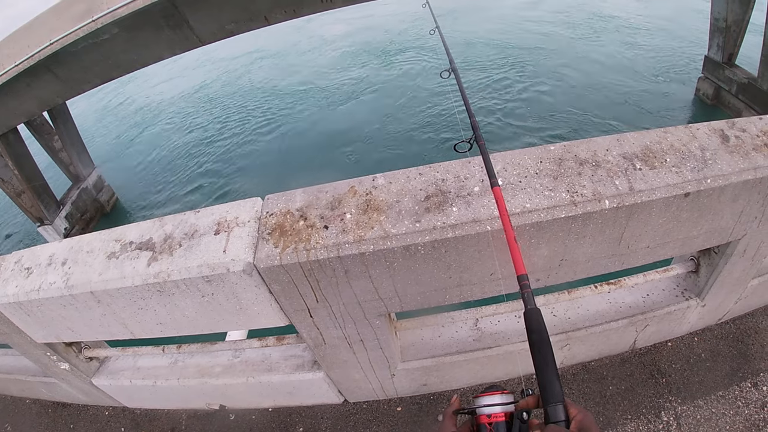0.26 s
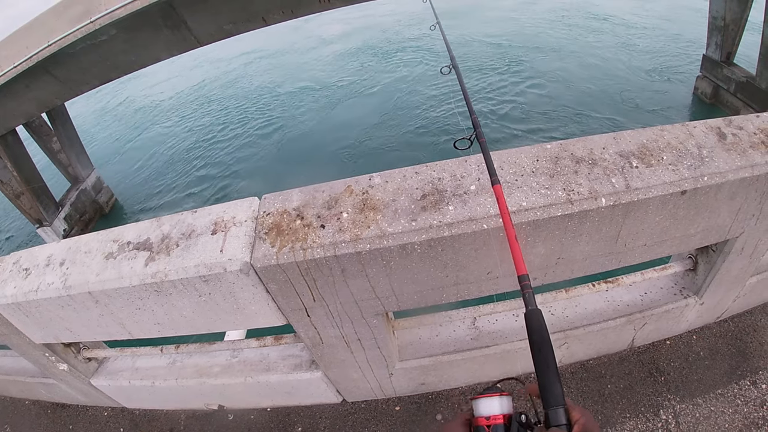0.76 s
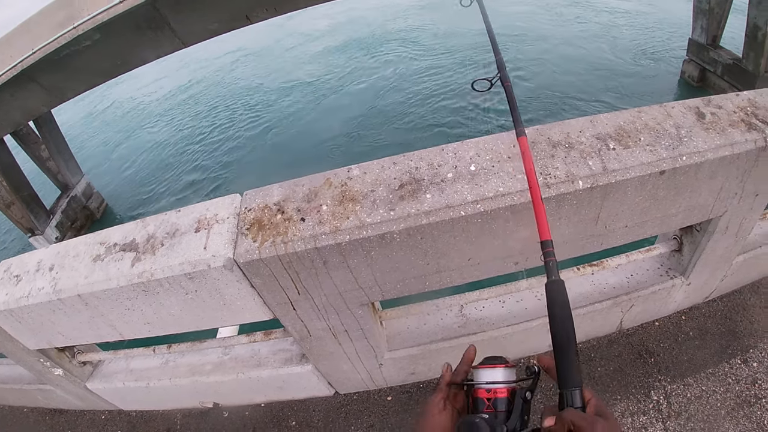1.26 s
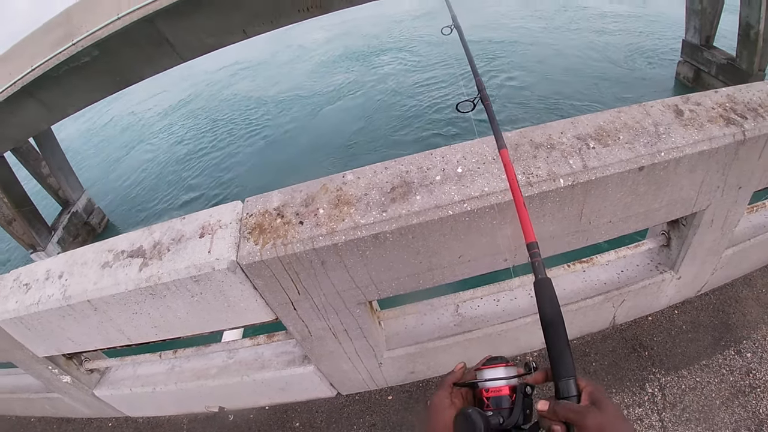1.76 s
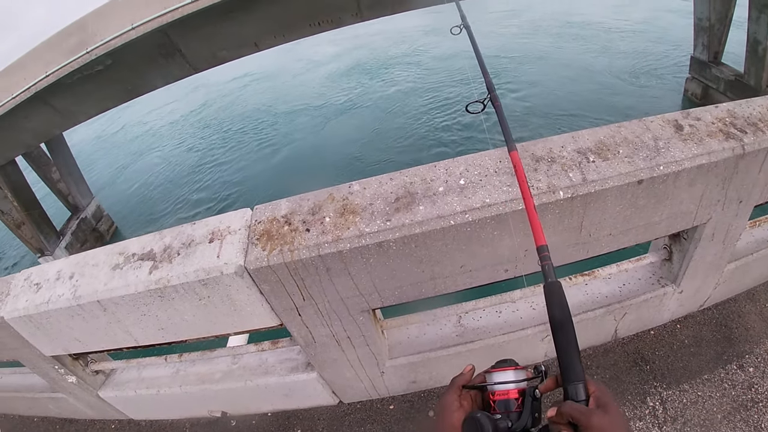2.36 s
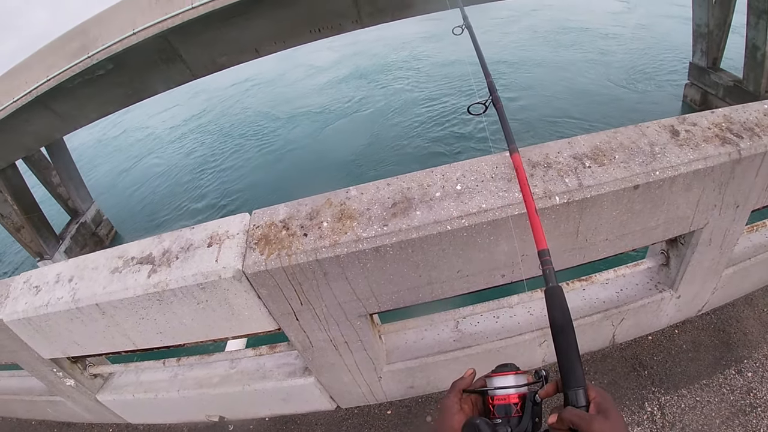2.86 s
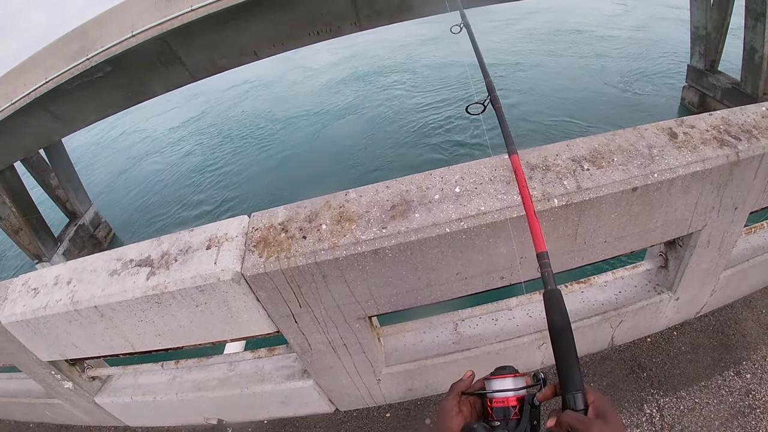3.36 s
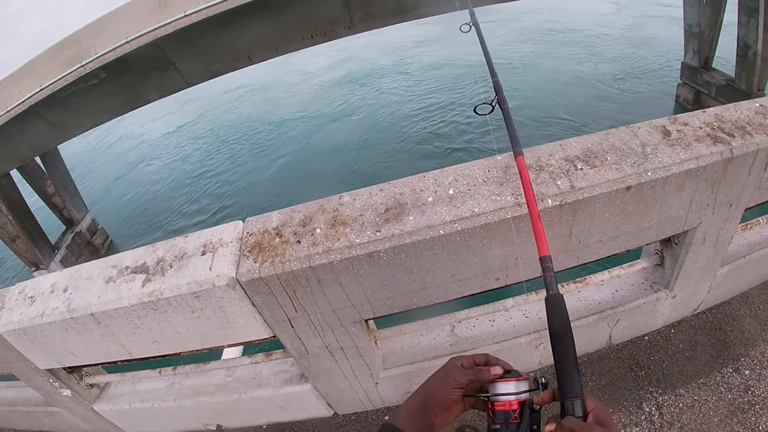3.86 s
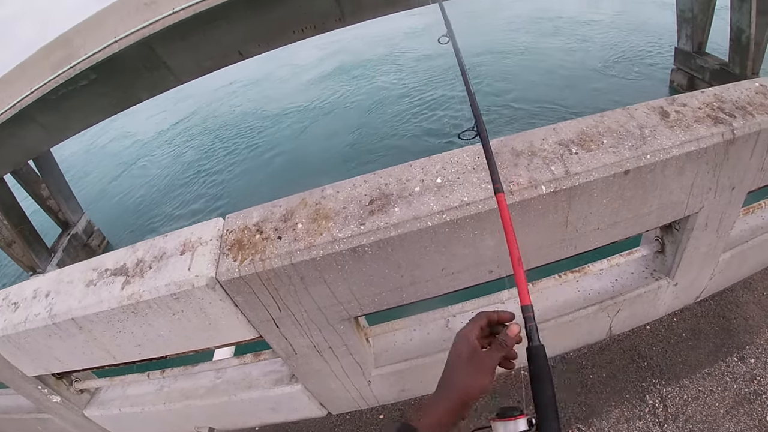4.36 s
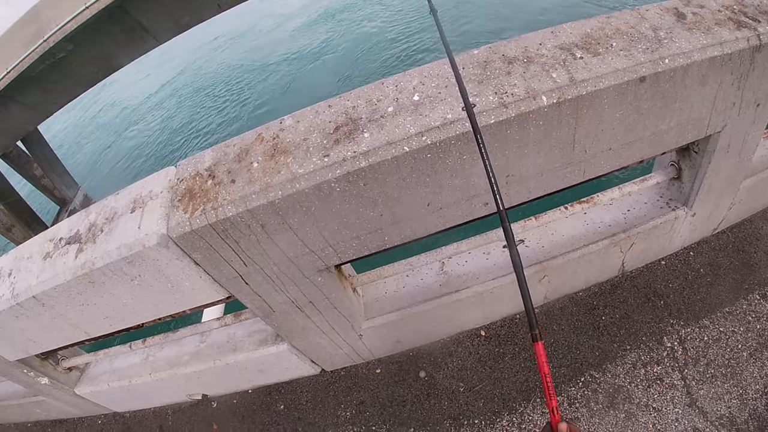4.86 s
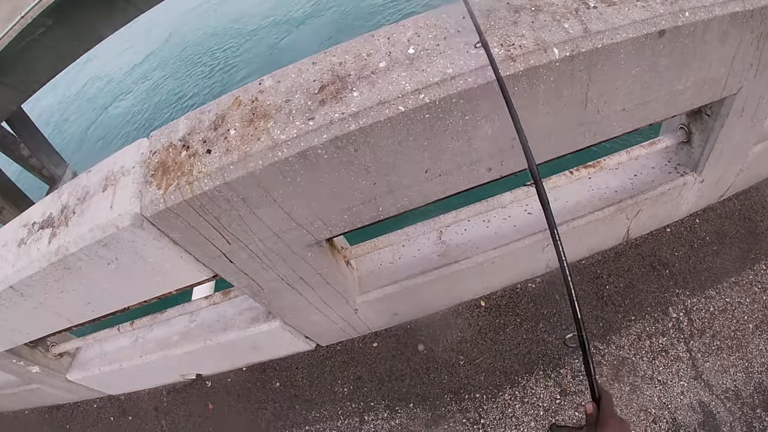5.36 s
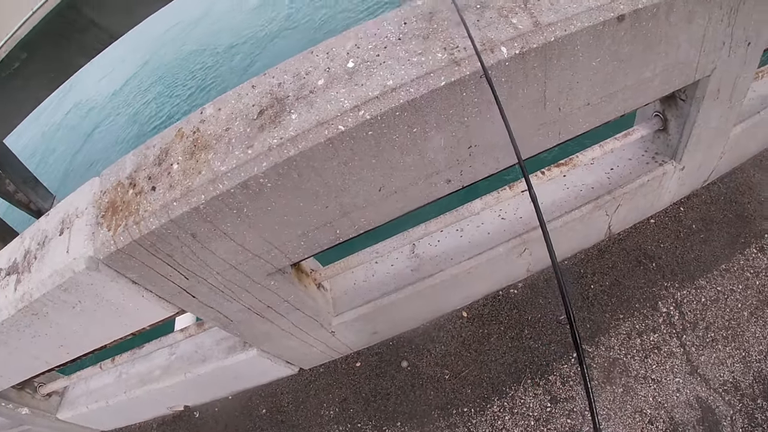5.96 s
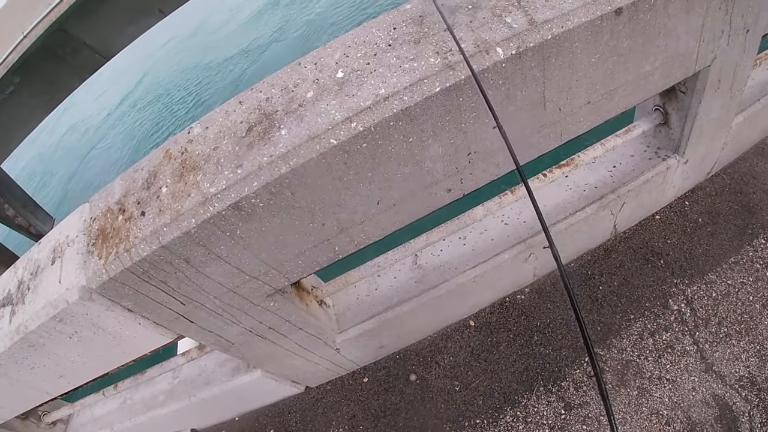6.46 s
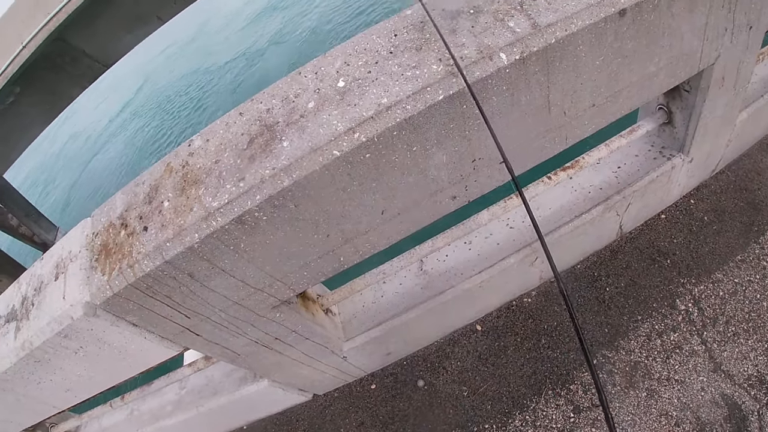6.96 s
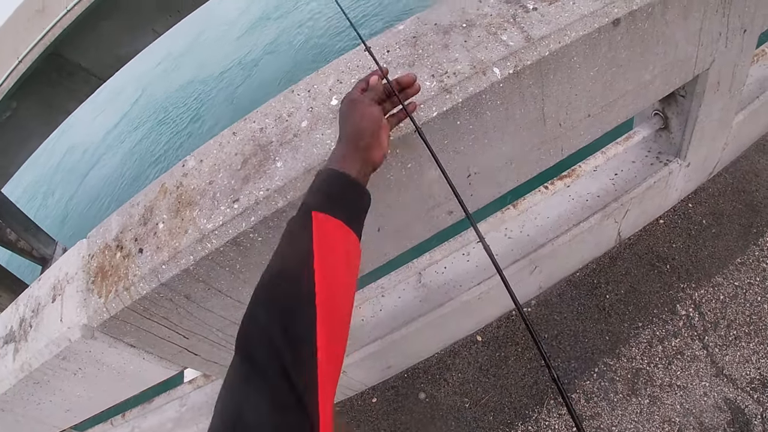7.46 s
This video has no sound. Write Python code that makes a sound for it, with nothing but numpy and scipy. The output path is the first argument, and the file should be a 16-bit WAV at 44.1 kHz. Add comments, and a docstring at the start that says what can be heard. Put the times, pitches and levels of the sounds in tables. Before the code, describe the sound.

From the start, broad traffic roar, tyre hiss and low engine drones surround a concrete pier, with a nearer vehicle leaving within the first second. Another car's tyre noise fades and sinks in pitch until about 4 s. Wind flutters and hums hollowly at the close microphone throughout. Light ticks at 0.6 and 0.8 s lead to a loud, bright bail snap at 0.86 s and a harder metallic clack with chatter at 1.2 s, with a brief hand rustle. Small ticks follow at 2.5 and around 3.1 s. Hands rub and nails faintly pick around 3.8-4.1 s; softer rubs and taps continue through 4.3-5.9 s. Gusts strengthen, thudding dully near 6.0, 6.7 and 7.0 s. A ringing tick comes at 6.4 s, another at 6.9 s, tiny line chirps at 6.8 and 7.5 s, and a last rub under a heavy gust at 7.6 s.

```python
"""A concrete pier beside a highway bridge, with someone fishing: traffic made of coloured noise and narrow
drones roars behind, and one car's tyre noise fades and sinks in pitch. Wind noise buffets the microphone and
hums in its housing. Close by, the bail of a spinning reel clicks in ringing modes, the rod ticks as it is
leaned on the railing, the line squeaks in falling chirps, and hands and sleeves rustle as grainy noise."""
import sys
import numpy as np
from scipy import signal
from scipy.fft import rfft, irfft, next_fast_len
from scipy.io import wavfile
from scipy.ndimage import uniform_filter1d, minimum_filter1d, map_coordinates

SR = 44100
rng = np.random.default_rng(int(sys.argv[2]) if len(sys.argv) > 2 else 0)


def inscribe(sig):
    """Save sig as 16-bit PCM at rate SR to the path in sys.argv[1].

    A 1-D sig is mono; a 2-D sig holds one channel per row.
    Samples are clipped to [-1, 1] before scaling.
    """
    pcm = np.round(np.clip(np.atleast_2d(sig).T, -1, 1) * 32767)
    wavfile.write(sys.argv[1], SR, pcm.astype(np.int16))


N = 340011

# Colour of a hard contact. Each row: frequency in Hz, relative level in dB per Hz.
SNAP_COLOUR = [(600, -28), (2000, 0), (3500, 3.5), (4600, 0.5), (6300, -2.5), (8500, -9), (11000, -11.5),
               (13500, -17.5), (15500, -26.5)]
# Colour of skin or nail catching on a surface. Each row: frequency in Hz, relative level in dB per Hz.
SCRATCH_COLOUR = [(4000, -4), (6500, 4.5), (8500, -2.5), (12500, 2.5), (14000, -9), (15500, -32)]


def amp(db):
    """Amplitude factor of a level in dB."""
    return 10 ** (np.asarray(db) / 20)


def unit(x):
    """x scaled to rms 1."""
    return x / np.sqrt(np.mean(x ** 2) + 1e-20)


def curves(rows):
    """One value per sample for each column after the time."""
    s, *cols = np.transpose(rows)
    return [np.interp(np.arange(N) / SR, s, c) for c in cols]


def wobble(rate):
    """A smooth random curve, rate knots a second."""
    knots = rng.standard_normal(int(N * rate / SR) + 4)
    return map_coordinates(knots, [np.arange(N) * rate / SR])


def swell(s, length):
    """A rounded rise, hold and fall of height 1 about time s."""
    edge = 2.7  # steepness of the flanks
    return np.exp(-np.abs(2 * (np.arange(N) / SR - s) / length) ** edge)


def filtered(x, response):
    """x times a response of frequency."""
    m = next_fast_len(len(x) + 8192)
    return irfft(rfft(x, m) * response(np.fft.rfftfreq(m, 1 / SR)), m)[:len(x)]


def noise(spectrum, size=N):
    """Noise of rms 1 with the colour of the (Hz, dB) points."""
    f, db = np.transpose(spectrum)

    def colour(hz):
        return amp(np.interp(np.log(hz + 1), np.log(f), db, right=-120))

    return unit(filtered(rng.standard_normal(size), colour))


def patchy(x, depth_db):
    """x with patches of random gain over time and frequency."""
    z = signal.stft(x, nperseg=512)[2]
    field = uniform_filter1d(rng.standard_normal(z.shape), size=4, axis=0)
    field = uniform_filter1d(field, size=22, axis=1)
    patched = signal.istft(z * amp(depth_db * unit(field)), nperseg=512)[1]
    return unit(patched[:N])


def band(centre_hz, width_hz):
    """Narrow noise of rms 1 about a fixed or moving centre, with skirts that end below the high treble."""
    def skirt(hz):
        return np.exp(-(hz / 7000) ** 2) / (1 + (2 * hz / width_hz) ** 2)

    slow = filtered(rng.standard_normal(N), skirt)
    other = filtered(rng.standard_normal(N), skirt)
    phase = 2 * np.pi * np.cumsum(centre_hz * np.ones(N)) / SR
    return unit(slow * np.cos(phase) + other * np.sin(phase))


def steady(x, span=0.066):
    """x with its slow chance swells evened out over a span in seconds."""
    return x / np.sqrt(np.abs(uniform_filter1d(x * x, size=int(span * SR))) + 1e-9)


def glide(x, ratio):
    """x with its pitch scaled by a moving ratio."""
    return map_coordinates(x, [np.cumsum(ratio)], mode="mirror")


def add(track, s, sound):
    """Mix a sound into the track at time s."""
    start = max(round(s * SR), 0)
    track[start:start + len(sound)] += sound[:max(N - start, 0)]


def traffic():
    """Many vehicles blend into a roar with tyre hiss on top and wavering drones inside."""
    # Traffic on the bridge. Each row: time in seconds, roar and tyre hiss in dB before their trims.
    flow = [(0, -30.5, -42), (.5, -30, -39.5), (1.9, -33, -41), (2.8, -32, -42), (4.1, -32.5, -42),
            (4.65, -33, -42), (5.1, -33, -43.5), (5.8, -34.5, -42), (6.12, -35.5, -45), (6.5, -34, -43.5),
            (7.1, -33, -43), (7.7, -32.5, -42)]
    # Colour of the roar. Each row: frequency in Hz, relative level in dB per Hz.
    roar_colour = [(25, -9), (65, 4.5), (100, 4), (170, 8), (270, -3.5), (375, 1.5), (490, -3.5),
                   (700, 2.5), (900, -0.5), (1200, 2), (1600, -2.5), (2000, -12.5), (3000, -39),
                   (6000, -70)]
    # Colour of the tyre hiss. Each row: frequency in Hz, relative level in dB per Hz.
    hiss_colour = [(900, -6), (1900, 4), (2800, 2), (3500, -5), (4400, -8.5), (5800, -15), (7000, -27.5),
                   (9000, -36.5), (12500, -54), (14000, -75.5)]
    # Distant tyre whine that comes and goes. Each row: time in seconds, level in dB.
    whine_levels = [(0, -47), (2.6, -51), (3.0, -44.5), (3.8, -53.5), (4.9, -40.5), (6.2, -43.5),
                    (6.8, -45), (7.7, -48)]
    # Low part of the roar, which thins out for a while. Each row: time in seconds, level in dB.
    low_roar_levels = [(0, -43.5), (1.3, -39), (3.6, -40), (4.6, -47), (5.6, -52), (6.2, -44.5),
                       (7.7, -39.5)]
    # Low engine drone that sinks away and returns. Each row: time in seconds, level in dB.
    low_drone_levels = [(0, -32), (1.5, -31.5), (2.2, -33.5), (2.8, -40.5), (3.5, -35.5), (3.9, -27.5),
                        (4.2, -49.5), (5.5, -44.5), (7.7, -39.5)]
    # Narrow drones of engines and bridge deck. Each row: centre in Hz, width in Hz, level in dB.
    drones = [(63.56, 19, -34), (84.4, 4, -42), (194.6, 2.6, -35), (780, 27, -45.5)]

    roar_db, hiss_db = curves(flow)
    whine_db, = curves(whine_levels)
    low_db, = curves(low_roar_levels)
    drone_db, = curves(low_drone_levels)
    roar = amp(roar_db + 4.0 + 0.12 * wobble(5)) * patchy(noise(roar_colour), depth_db=0.35)
    hiss = amp(hiss_db + 2 + 0.15 * wobble(15.0)) * patchy(noise(hiss_colour), depth_db=1.5)
    whine = amp(whine_db) * band(1166 + 6 * wobble(3), width_hz=25)
    low_roar = amp(low_db) * band(490, width_hz=270)
    low_drone = amp(drone_db) * band(127, width_hz=15)
    steady_drones = sum(amp(db) * band(hz, width) for hz, width, db in drones)
    return roar + low_roar + hiss + whine + low_drone + steady_drones


def cars():
    """Single vehicles: one car's tyre noise fades and sinks, others leave or swell, a heavy engine rumbles."""
    # Car drawing away. Each row: time in seconds, level in dB before a trim, centre of the tyre noise in Hz.
    receding = [(0, -39, 1686), (.7, -33, 1650), (1.3, -35.5, 1651), (1.6, -37.5, 1602), (2.1, -34.5, 1544),
                (2.8, -35.5, 1370), (3.4, -41, 1300), (4.2, -47, 1302), (7.7, -56.5, 1201)]
    # Nearer vehicle already leaving. Each row: time in seconds, level in dB before a trim.
    leaving = [(0, -28), (.4, -28.5), (.8, -46), (1.4, -65), (3, -64.5)]
    # Its colour. Each row: frequency in Hz, relative level in dB per Hz.
    leaving_colour = [(350, -14.5), (720, 2), (1150, -0.5), (1600, -4), (2400, -7), (4500, -30)]
    # Brief swells of other tyres. Each row: middle in seconds, length in seconds, level in dB,
    # centre in Hz, width in Hz.
    surges = [(.12, 0.43, -33, 1038, 220), (.38, 0.51, -35, 745, 170), (1.202, 0.33, -39.5, 1366, 120),
              (2.822, 0.33, -34.5, 1083, 260), (3.05, 0.43, -40, 1693, 258.6),
              (3.85, 0.27, -39.5, 1791, 601), (5.9, 1.5, -39, 716, 280), (7.5, .5, -40, 1446, 600)]
    # Heavy engine on the bridge, whose level dips. Each row: time in seconds, mean level in dB.
    engine_levels = [(0, -30.5), (1, -30), (3.3, -30.5), (3.8, -35.5), (4.4, -28), (5.5, -34.5),
                     (6.25, -44), (6.5, -29.5), (7.12, -44), (7.7, -24)]
    # Its exhaust colour. Each row: frequency in Hz, relative level in dB per Hz.
    exhaust_colour = [(150, -30.5), (215, -4.5), (250, -1), (285, -5), (305, -6), (320, 1), (338, -9),
                      (400, -15), (520, -25.5), (900, -51)]

    car_db, tyre_hz = curves(receding)
    leaving_db, = curves(leaving)
    engine_db, = curves(engine_levels)
    tread = band(tyre_hz, width_hz=550) + band(tyre_hz, width_hz=200)
    tyres = amp(car_db - 3.0) * tread
    tyres += amp(leaving_db - 8.5) * noise(leaving_colour)
    for s, length, db, hz, width in surges:
        tyres += amp(db) * swell(s, length) * band(hz, width)
    engine = amp(engine_db + 0.32 * wobble(13)) * noise(exhaust_colour)
    return tyres + engine


def wind(gust_db=-20, growth=0.94, flutter_db=-2.1):
    """Gusts on a fluttering breeze drive large and small eddies at the microphone; its housing hums."""
    # Breeze between the gusts. Each row: time in seconds, mean strength in dB.
    breeze = [(0, -36), (1.2, -29), (3.4, -26), (5.1, -27), (6.4, -23), (7.7, -24)]
    # Gusts at the microphone. Each row: middle in seconds, length in seconds, strength in dB.
    gusts = [(0.0, 0.1, -21.5), (.17, 0.19, -23), (0.758, 0.12, -21.5), (1.41, 0.21, -22.5),
             (2.314, 0.2, -19.5), (2.598, 0.36, -24.5), (3.023, 0.063, -23), (3.83, 0.14, -21.5),
             (3.927, 0.079, -16.5), (4.317, 0.16, -22), (4.738, 0.1, -22), (5.227, .06, -28),
             (5.405, 0.14, -24), (5.647, 0.16, -19.5), (6.049, 0.27, -16.5), (6.71, 0.15, -19.5),
             (6.935, 0.15, -16.5), (7.655, 0.28, -15)]
    # Large turbulence. Each row: frequency in Hz, relative level in dB per Hz.
    large_colour = [(12, -18), (22, -3.5), (34, -2), (48, -3), (78, 0), (102, -7), (128, -8.5), (165, -11),
                    (250, -32.5), (450, -45.5), (900, -62)]
    # Small turbulence. Each row: frequency in Hz, relative level in dB per Hz.
    small_colour = [(70, -25.5), (140, 6.5), (240, -7.5), (340, -8.5), (480, -14), (900, -22)]
    # Air stream across the housing. Each row: time in seconds, hollow hum in dB before lulls and trim.
    draught = [(0, -23), (.48, -22), (.6, -18), (.76, -24), (.95, -18), (1.35, -22), (2.0, -18.5),
               (2.25, -25.5), (3.1, -18.5), (4.3, -19.5), (5.5, -18.5), (7.55, -23.5), (7.7, -13)]
    # The stream turns away and the hum drops. Each row: middle in seconds, length in seconds, depth in dB.
    lulls = [(2.753, 0.33, 15), (4.013, 0.11, 9), (4.464, 0.18, 3), (6.226, 0.34, 12), (6.798, 0.18, 12),
             (7.228, 0.26, 8)]
    # Resonance of the housing. Each row: frequency in Hz before the glide, relative level in dB per Hz.
    housing_colour = [(60, -33.5), (105, -20.5), (130, -10), (165, -0.5), (192, 0.5), (215, -6),
                      (240, -11.5), (290, -18), (380, -24.5), (600, -37)]
    # Drift of the hum with the air stream. Each row: time in seconds, ratio to the housing's own pitch.
    hum_pitch = [(0, 0.93), (.45, 0.9), (.65, 1.03), (1.1, 1), (1.45, .92), (1.9, 0.99), (3.2, 1.077),
                 (3.8, 0.99), (4.3, .94), (4.8, 0.99), (5.6, 0.98), (6.4, 0.97), (7.7, 0.85)]

    breeze_db, = curves(breeze)
    draught_db, = curves(draught)
    hum_ratio, = curves(hum_pitch)
    power = amp(breeze_db + flutter_db * wobble(19)) ** 2
    power += sum(amp(db) ** 2 * swell(s, length) for s, length, db in gusts)
    # how far the wind stands above or below a typical gust
    excess_db = 10 * np.log10(power) - gust_db + 0.5 * wobble(25)
    large = amp(1.68 * excess_db - 22.0) * steady(noise(large_colour))
    small = amp(growth * excess_db - 31.0) * noise(small_colour)

    hum_db = draught_db - sum(depth_db * swell(s, length) for s, length, depth_db in lulls)
    hum_tone = steady(glide(noise(housing_colour), hum_ratio), span=0.11)
    hum = amp(hum_db + 1.5 * wobble(14) - 3.5) * hum_tone
    return large + small + hum


def thumps():
    """A single eddy that strikes the microphone squarely gives a short dull thud."""
    # Eddies that hit. Each row: middle in seconds, length at half height in seconds, level in dB.
    eddy_hits = [(3.923, 0.026, -35), (5.989, 0.034, -13.5), (6.05, 0.015, -14.5), (6.675, 0.033, -15.5),
                 (6.96, 0.047, -19), (7.642, .06, -27)]
    # Colour of the thud. Each row: frequency in Hz, relative level in dB per Hz.
    thud_colour = [(25, -1), (60, -15), (130, -4.5), (250, 1.5), (350, -10), (450, -18), (800, -28)]
    out = np.zeros(N)
    for s, length, db in eddy_hits:
        thud = unit(noise(thud_colour, size=SR // 4)[:int(2 * length * SR)])
        add(out, s - length, amp(db) * np.hanning(len(thud)) * thud)
    return out


def catches(scatter_db=4.0, t60=0.018):
    """One second of tiny overlapping catches of uneven size, as an envelope of rms 1."""
    per_second = 220
    hits = (rng.random(SR) < per_second / SR) * amp(scatter_db * rng.standard_normal(SR))
    decay = amp(-60 * np.arange(SR // 50) / SR / t60)
    return unit(signal.fftconvolve(hits, decay)[:SR])


def handling(grain_db=3.5, catch_db=-3):
    """Skin and cloth catch and slip: grainy hiss and finer scratch swell with each stroke, over a sizzle."""
    # Faint high sizzle of air and clothing. Each row: time in seconds, mean level in dB.
    sizzle_levels = [(0, -90), (1.5, -80), (2.7, -75), (3.1, -77), (5.5, -72), (6.1, -76), (7.7, -72.5)]
    # Its colour. Each row: frequency in Hz, relative level in dB per Hz.
    sizzle_colour = [(5000, -8), (7500, -3.5), (9000, -1), (10500, -7.5), (12500, -11), (13300, -23.5),
                     (15500, -48.5)]
    # Hands sliding on rod and reel. Each row: middle in seconds, length at half height in seconds,
    # rub in dB, centre in Hz, spread to either side in octaves, fine scratch in dB.
    rubs = [(1.101, 0.44, -58, 5795, 0.15, -76), (1.242, .025, -45, 4970, 0.39, -58),
            (1.321, 0.1, -48, 5600, 0.12, -78), (2.974, 0.051, -59.5, 6000, .42, -76),
            (3.17, 0.22, -62, 3800, 0.55, -72), (3.43, .035, -60, 6185, 0.3, -67),
            (3.808, 0.055, -40.5, 3370, 0.54, -62), (4.012, .13, -49, 3288, 0.52, -71),
            (4.272, 0.042, -54, 3940, 0.63, -67.5), (4.556, .14, -44, 2887, 0.31, -70),
            (4.792, 0.077, -44.5, 3157, 0.31, -72), (5.686, 0.16, -42, 2970, 0.35, -86),
            (7.43, 0.22, -71, 8450, 0.041, -80), (7.622, 0.23, -44, 2900, 0.3, -79)]

    sizzle_db, = curves(sizzle_levels)
    out = amp(sizzle_db + 2 * wobble(90) + 1.2 * wobble(9)) * noise(sizzle_colour)
    for s, length, db, centre_hz, octaves, scratch_db in rubs:
        def colour(hz):
            return np.exp(-.5 * (np.log2((hz + 1) / centre_hz) / octaves) ** 2)

        size = min(int(2 * length * SR), SR)
        slips = catches()
        roughness = unit(uniform_filter1d(rng.standard_normal(SR), size=90))
        grains = unit(amp(grain_db * roughness)) + amp(catch_db) * slips
        rub = unit(filtered(grains * rng.standard_normal(SR), colour)[:size])
        scratch = unit(((grains + slips) * noise(SCRATCH_COLOUR, size=SR))[:size])
        add(out, s - length, np.hanning(size) * (amp(db) * rub + amp(scratch_db) * scratch))
    return out


def picks(t60=.014):
    """A fingernail catches on the spool with a dry little tick of decaying noise."""
    # Fingers picking at the spool. Each row: start in seconds, level in dB.
    nail_ticks = [(2.981, -60), (3.7686, -57.5), (3.9632, -54), (4.0, -59), (4.029, -54.5), (4.0585, -61),
                  (4.0986, -60)]
    out, t = np.zeros(N), np.arange(SR // 20) / SR
    for s, db in nail_ticks:
        add(out, s, amp(db - 60 * t / t60) * noise(SCRATCH_COLOUR, size=len(t)))
    return out


def squeaks():
    """The line slips in a rod guide with a short falling chirp."""
    # Slips of the line. Each row: middle in seconds, length at half height in seconds, peak level in dB,
    # first pitch in Hz, last pitch in Hz.
    slips = [(6.843, 0.015, -34, 2720, 2610), (7.493, 0.02, -36.5, 3250, 2670)]
    out = np.zeros(N)
    for s, length, db, first_hz, last_hz in slips:
        hz = np.linspace(first_hz, last_hz, int(2 * length * SR))
        chirp = np.sin(2 * np.pi * np.cumsum(hz) / SR)
        add(out, s - length, amp(db) * np.hanning(len(hz)) * chirp)
    return out


def tackle():
    """Each tick is a snap, duller for a softer contact, with a short ring of rod or tackle."""
    # Light ticks. Each row: start in seconds, ring in dB, ring pitch in Hz, ring time scale in seconds,
    # snap in dB, snap 60 dB decay in seconds, frequency in Hz above which the snap dulls.
    ticks = [(.612, -32.5, 3640, .048, -31.5, 0.043, 12000),
             (0.7906, -27.5, 3030, 0.026, -31.5, 0.02, 8000), (2.537, -32.5, 3750, .05, -31, 0.032, 14000),
             (3.065, -33.5, 2950, 0.036, -45, .01, 8000), (3.172, -29, 3330, 0.018, -33.5, .018, 6000),
             (4.2694, -34.5, 3580, .025, -46, .03, 6980), (4.8903, -27, 3100, 0.021, -36, .014, 4000),
             (5.677, -36.5, 4760, .024, -54, .01, 8000), (5.882, -48, 6850, 0.023, -45, 0.023, 20000),
             (6.3934, -32, 3740, 0.053, -39, 0.044, 9500), (6.932, -37, 4360, 0.016, -37, .017, 7000)]
    # Modes that every tick rings. Each row: ratio to the ring pitch, relative level in dB,
    # share of the ring time scale that the mode takes to fall 60 dB.
    modes = [(1.0, 5, 0.69), (1.12, -20.5, 0.45), (1.75, -23, 0.5)]

    out, t = np.zeros(N), np.arange(SR // 10) / SR
    for s, ring_db, hz, ring_t60, snap_db, snap_t60, dull_hz in ticks:
        def dulling(f):
            return 1 / np.hypot(1, (f / dull_hz) ** 4)

        ring = sum(amp(db - 60 * t / (share * ring_t60)) * np.sin(2 * np.pi * hz * ratio * t)
                   for ratio, db, share in modes)
        contact = filtered(noise(SNAP_COLOUR, size=len(t)), dulling)
        snap = amp(snap_db - 60 * t / snap_t60) * contact
        attack = 1 - np.exp(-t / 0.00013)
        add(out, s, (amp(ring_db) * ring + snap) * attack)
    return out


def bail(attack_s=0.00039, scatter_db=1, detune=0.011):
    """Each contact of the sprung bail snaps and rings wire and frame, each time a little differently."""
    # The bail snaps open, then shuts and chatters. Each row: start in seconds, wire in dB,
    # wire pitch ratio, frame in dB, snap in dB, snap 60 dB decay in seconds.
    contacts = [(0.8643, -8.5, 1.004, -31, -15, .007), (1.2165, -17.5, 1.12, -26, -9.5, 0.0049),
                (1.2183, -15, 0.94, -25, -29.5, .03), (1.2457, -26, 1.11, -26, -25, 0.0066),
                (1.2452, -17, .92, -10.5, -18, 0.0057), (1.2485, -25, 1.25, -16.5, -23, 0.013),
                (1.2563, -31, 1.2, -25, -39, 0.018)]
    # Modes of the bail wire. Each row: mean frequency in Hz before the pitch ratio,
    # mean relative level in dB, 60 dB decay in seconds.
    wire_modes = [(3080, 1, 0.014), (3440, -2, 0.0093), (3720, -5, .007), (5800, -16, .009),
                  (6700, -10, 0.006)]
    # Modes of the reel frame. Each row: mean frequency in Hz, mean relative level in dB,
    # 60 dB decay in seconds.
    frame_modes = [(1340, 2, 0.019), (1500, -5, 0.037), (1860, -8, .014), (2350, -1, 0.019),
                   (2650, -4.5, 0.016), (3040, -3, 0.025), (3500, -12, .011), (4190, -7, .011),
                   (4840, -9.5, 0.01), (5540, -11, 0.011), (6140, -13, .009)]
    out, t = np.zeros(N), np.arange(SR // 10) / SR

    def ring(modes, ratio):
        """Decaying sines of alternating polarity, scattered in level and pitch."""
        chance = rng.standard_normal((len(modes), 2))
        total = np.zeros(len(t))
        for k, ((hz, db, t60), (a, b)) in enumerate(zip(modes, chance)):
            decay = amp(db + scatter_db * a - 60 * t / t60)
            total += (-1) ** k * decay * np.sin(2 * np.pi * hz * ratio * (1 + detune * b) * t)
        return total

    for s, wire_db, wire_ratio, frame_db, snap_db, snap_t60 in contacts:
        snap = amp(snap_db - 60 * t / snap_t60) * noise(SNAP_COLOUR, size=len(t))
        wire = amp(wire_db) * ring(wire_modes, wire_ratio)
        frame = amp(frame_db) * ring(frame_modes, 1)
        add(out, s, (wire + frame + snap) * (1 - np.exp(-t / attack_s)))
    return out


def railing(x, wet_db=-15, t60=0.049):
    """Concrete and the angler's body scatter a brief echo behind each sound."""
    t = np.arange(SR // 10) / SR
    tail = rng.standard_normal(len(t)) * amp(-60 * t / t60) * (t > .002)
    echo = signal.fftconvolve(x, tail / np.linalg.norm(tail))[:N]
    return x + amp(wet_db) * echo


def scene():
    """Traffic and wind behind, handling noise closer, and the echoing clicks of rod and reel in front."""
    background = traffic() + cars() + wind() + thumps()
    hands = handling() + picks()
    rod_and_reel = railing(squeaks() + tackle() + bail())
    return (background + hands + rod_and_reel)[None]


def record(dry):
    """A smooth gain ducks peaks over a ceiling, and a steep low-pass ends the treble."""
    ceiling_db, top_hz = -3.5, 15700
    size = SR // 80  # span of the gain smoothing in samples
    needed = np.minimum(1, amp(ceiling_db) / (np.abs(dry) + 1e-9))
    gain = uniform_filter1d(minimum_filter1d(needed, size=size), size=size)
    ducked = dry * gain

    def low_pass(hz):
        return 1 / (1 + (hz / top_hz) ** 70)

    return np.array([filtered(x, low_pass) for x in ducked])


dry = scene()
out = record(dry)
inscribe(out)
```